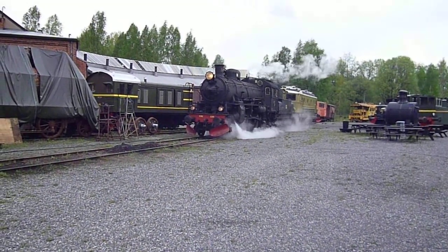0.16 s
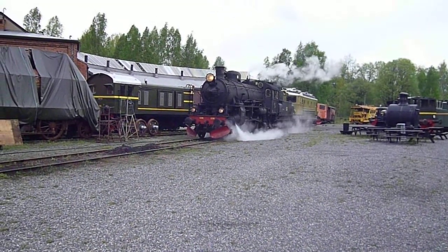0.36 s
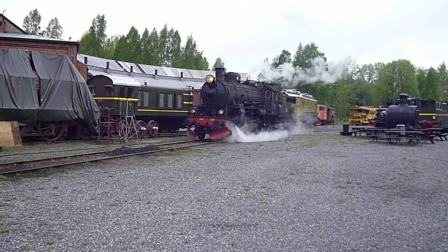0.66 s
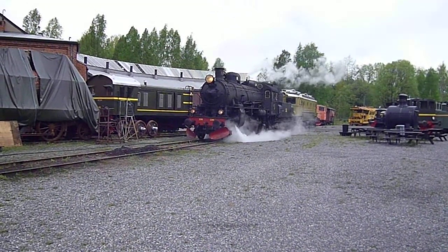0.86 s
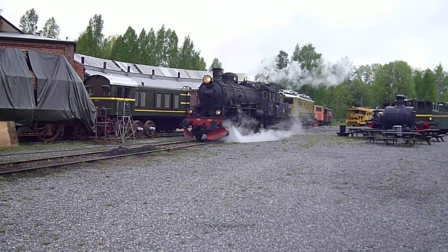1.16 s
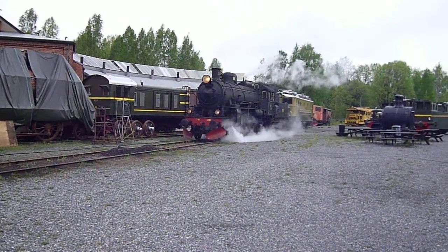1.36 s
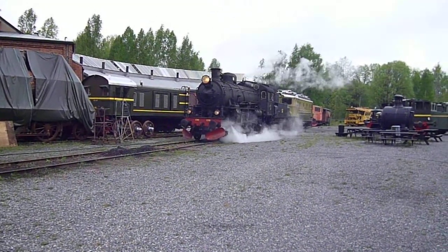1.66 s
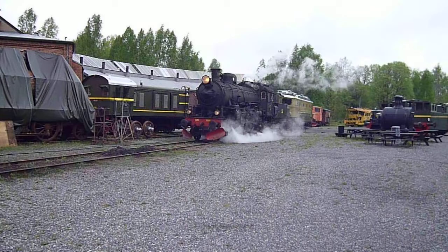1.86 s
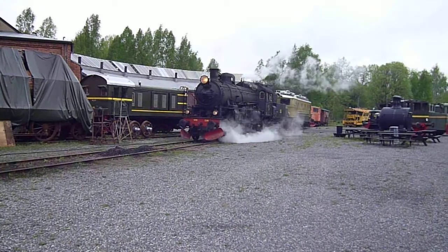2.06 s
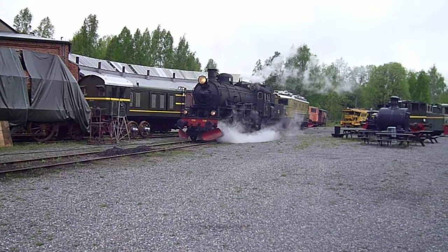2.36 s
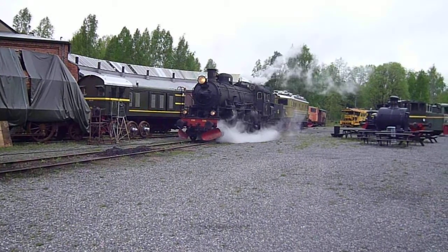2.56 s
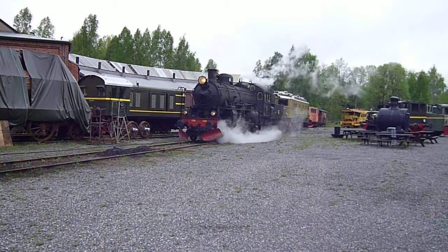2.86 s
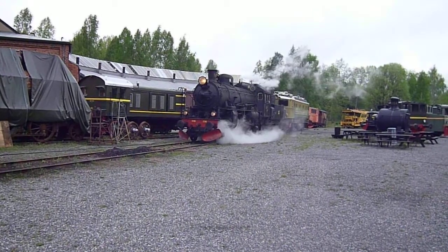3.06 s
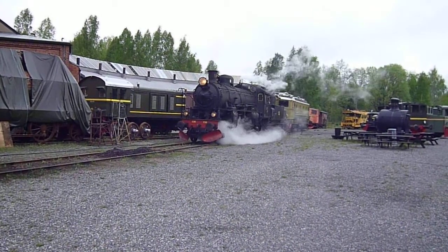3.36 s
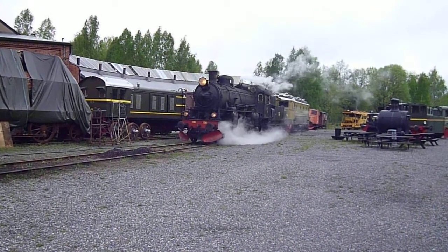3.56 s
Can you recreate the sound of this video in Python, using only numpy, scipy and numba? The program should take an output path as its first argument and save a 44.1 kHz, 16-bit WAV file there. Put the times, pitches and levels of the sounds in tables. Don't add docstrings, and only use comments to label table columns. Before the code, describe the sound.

Steam hisses steadily from a locomotive's drain valves, with wind thumps and one metallic clank.

```python
import sys
import numpy as np
from scipy import signal
from scipy.fft import rfft, irfft
from scipy.io import wavfile
from scipy.ndimage import uniform_filter1d
from numba import njit

SR = 44100
rng = np.random.default_rng(int(sys.argv[2]) if len(sys.argv) > 2 else 0)


def how_loud(loudness_db):
    steps = np.asarray(loudness_db, float) / 20
    return 10 ** steps


def transcribe(u):
    v = np.clip(np.atleast_2d(u).T, -1, 1)
    q = np.round(v * 32767).astype(np.int16)
    wavfile.write(sys.argv[1], SR, q)


N = 163170


@njit
def svf(x, hz, width):
    y, band_state, low_state = np.empty(len(x)), 0., 0.
    for i in range(len(x)):
        g, damping = np.tan(np.pi * hz[i] / SR), width / hz[i]
        v = (band_state + g * (x[i] - low_state)) / (1 + g * (g + damping))
        band_state = 2 * v - band_state
        low_state += 2 * g * v
        y[i] = damping * v
    return y


def band(hz, width):
    y = svf(rng.standard_normal(N), hz * np.ones(N), 1. * width)
    return y / y.std()


def steep(hz, width, order):
    y = band(hz, width)
    for _ in range(order):
        y = svf(y, hz * np.ones(N), 1. * width)
    return y / y.std()


def walk(rate):
    hold = int(SR / rate)
    w = np.repeat(rng.standard_normal(N // hold + 1), hold)
    w = uniform_filter1d(uniform_filter1d(w, hold), hold)[:N]
    return (w - w.mean()) / w.std()


def follow(points, t):
    return how_loud(np.interp(t, *np.array(points).T))


def drone(t):
    # centre in Hz, width in Hz, level in dB
    resonances = [
        (162, 46, -14),
        (292.6, 8.2, -25),
        (317.5, 14, -21),
    ]
    # time in seconds, level in dB
    draught = [
        (0, -2),
        (.6, 1.5),
        (1.2, 0),
        (1.8, -5.5),
        (2.4, 0),
        (2.8, 0),
        (3.3, 1.5),
        (3.7, 1),
    ]
    out = np.zeros(N)
    for hz, width, db in resonances:
        wavering_hz = hz * (1 + 0.019 * walk(4))
        out += steep(wavering_hz, width, order=1) * how_loud(db + 1.2 * walk(8.22))
    return follow(draught, t) * out


def buffer(t):
    # start in seconds, frequency in Hz, peak in dB, T60 in seconds
    partials = [(1.809, 655, -35.5, 1.4), (1.812, 666, -42, 1.4), (1.81, 700, -31, 0.13),
                (1.815, 1420, -28, .12), (1.855, 1475, -28, .16), (1.845, 942, -37, 0.38),
                (1.842, 985, -27, .1), (1.834, 4250, -27, .05), (1.86, 1136, -36, .26),
                (1.85, 1700, -38, .3), (1.84, 1900, -40, 0.92), (1.5, 2300, -41, 0.36)]
    out = np.zeros(N)
    for start, hz, db, t60 in partials:
        age = np.clip(t - start, 0, None)
        level = how_loud(db - 60 * age / t60 + 2.0 * walk(18))
        out += level * (1 - np.exp(-age / .004)) * np.sin(2 * np.pi * hz * age)
    return out


def scrapes(t):
    # start in seconds, level in dB, brightness in Hz, fade in seconds
    blows = [(1.791, -33.5, 2700, 0.0091), (1.805, -25, 2870, 0.0083), (1.811, -31, 800, 0.009),
             (1.8092, -31, 1440, 0.01), (1.815, -28, 2510, .006), (1.8202, -22.5, 4220, 0.002),
             (1.827, -28, 3100, .006), (1.828, -36.5, 335, 0.036), (1.831, -28, 1890, .009),
             (1.836, -26.5, 4200, 0.0046), (1.843, -30.5, 2530, .012), (1.843, -31, 1050, 0.014),
             (1.858, -31, 1410, 0.0098), (1.872, -34, 1500, .014)]
    crack_s = 0.0014
    out = np.zeros(N)
    for start, db, bright_hz, fade_s in blows:
        age = np.clip(t - start, 0, None)
        envelope = (1 - np.exp(-age / crack_s)) * np.exp(-age / fade_s)
        out += how_loud(db) * envelope * steep(bright_hz, 1.03 * bright_hz, order=1)
    return out


def hard_strike(t):
    # frequency in Hz, level in dB, T60 in seconds
    modes = [
        (2630, -18.5, 0.022),
        (3090, -17, .033),
        (3470, -11.5, 0.015),
        (4160, -12.5, 0.018),
        (4530, -18, 0.013),
        (5140, -20, 0.023),
    ]
    start_s, rise_s = 1.8211, .0008
    age = np.clip(t - start_s, 0, None)
    ring = sum(how_loud(db - 60 * age / t60) * np.sin(2 * np.pi * hz * age) for hz, db, t60 in modes)
    return ring * (1 - np.exp(-age / rise_s))


def clank(t):
    # frequency in Hz, level in dB, T60 in seconds
    modes = [(329, 0, .15), (690, -4, .08), (770, -4, .1), (1000, -4, .08), (1181, -8, .06), (1322, -3, .1),
             (1470, 0, .1), (1830, -8, .06), (2706, -8, .05), (3020, -6, .04), (3400, -8, .04),
             (4200, -11, .03), (5200, -10, .03)]
    crack_db, ring_db = 3.5, -46.5
    echo_db, echo_t60_s, echo_hz = -22.5, 0.82, 900
    age = t[:SR]
    iron = np.zeros(SR)
    for hz, db, t60 in modes:
        iron += how_loud(db) * np.sin(2 * np.pi * hz * age) * np.exp(-np.log(1000) * age / t60)
    blows = scrapes(t)
    ring = signal.fftconvolve(blows, iron)[:N]
    out = hard_strike(t) + how_loud(crack_db) * blows + how_loud(ring_db) * ring
    tail = band(echo_hz, 1800)[:SR] * np.exp(-np.log(1000) * age / echo_t60_s)
    echo = signal.fftconvolve(out, tail)[:N] / np.sqrt(np.sum(tail ** 2))
    return out + 4 * how_loud(echo_db) * echo


def eddies(t):
    # time in seconds, peak in dB, frequency in Hz, length in cycles
    early = [(.0057, -22, 220, .3), (0.0098, -26, 250, 0.29), (.017, -35, 200, 0.34),
             (0.026, -30, 250, 0.35), (0.0417, -35, 164.0, 0.51), (.0875, -30.5, 170, 0.47),
             (0.0943, -25.5, 420, 0.44), (0.1083, -21, 180, 0.49), (0.1145, -26.5, 200, 0.21),
             (.2123, -28, 280, .4), (0.2194, -26, 420, 0.56), (0.239, -31, 268, 0.43),
             (.285, -29.5, 170, .35), (0.293, -28.5, 110, 0.45), (0.3057, -31, 230, 0.45),
             (.3133, -35, 250, .35), (0.4842, -21.5, 178, 0.53), (0.6342, -21, 120, 0.38),
             (0.6503, -15, 200, 0.46), (.66, -26, 190, .35), (0.6656, -22, 170, .35),
             (0.674, -23, 180, 0.44), (.68, -23, 130, .3), (0.6885, -25, 228, 0.4), (.695, -27, 230, .3),
             (0.699, -19, 255, 0.3), (.704, -24, 230, 0.31), (0.7107, -24, 170, 0.4),
             (0.721, -29, 170, 0.43), (0.7424, -28, 182.0, 0.63), (.7545, -24, 150, .4),
             (0.7603, -16.5, 155, 0.3), (.7665, -23, 300, .3), (0.7698, -18, 320, 0.52),
             (0.773, -15.5, 308, 0.86), (0.7803, -13, 190, 0.34), (0.783, -17, 241, 0.28),
             (0.7905, -18, 230, 0.33), (0.7948, -11.5, 212, 0.49), (0.8228, -29, 240, 0.5)]
    late = [(1.1238, -30, 130, .3), (1.1302, -20, 170, .55), (1.131, -10, 270, 0.28),
            (1.144, -25, 200, .35), (1.151, -18.5, 240, 0.38), (1.1553, -18, 200, 0.25),
            (1.1567, -23, 140, .45), (1.1738, -26, 560, 0.45), (1.1752, -23.5, 420, 0.46),
            (1.189, -29.4, 214.0, 0.6), (1.599, -34, 170, 0.3), (1.6147, -26, 139, 0.45),
            (1.9485, -32, 280, 0.44), (1.97, -26, 162.0, 0.49), (1.981, -28, 171, 0.2),
            (2.183, -28.5, 148, 0.51), (2.3598, -25.5, 260, 0.4), (2.366, -13.5, 149, 0.31),
            (2.395, -24.5, 161, 0.36), (2.402, -24.5, 104, 0.42), (3.448, -28, 207.0, 0.4),
            (3.459, -12.5, 186, 0.53), (3.4652, -17, 200, .3), (3.4735, -19, 220, 0.32),
            (3.4785, -12.5, 187, 0.48), (3.4882, -17, 129, 0.37), (3.5148, -18.5, 160, 0.29),
            (3.644, -23.5, 162, 0.67)]
    snaps = [(.0075, -28, 480, 0.56), (.031, -32, 620, .5), (.096, -32.5, 700, 0.4),
             (0.2202, -36, 517, 0.44), (0.6992, -27, 560, 0.3), (0.7705, -20, 450, 0.48),
             (3.4585, -24, 416, 0.25), (1.1311, -23, 800, 0.37), (1.155, -22, 600, 0.64),
             (1.178, -30, 600, 0.4), (1.1357, -28, 650, .4)]
    rebound = .15
    out = np.zeros(N)
    for time, db, hz, cycles in early + late + snaps:
        near = abs(t - time) < .04
        turns = (t[near] - time) * hz
        envelope = np.exp(-.5 * ((turns - rebound) / max(cycles, .2)) ** 2)
        out[near] -= how_loud(db) * np.cos(2 * np.pi * turns) * envelope
    return out


def wind(t):
    # start in seconds, length in seconds, level in dB
    gusts = [(0, 0.048, -47), (0.087, 0.028, -40), (0.203, 0.09, -52), (0.414, 0.063, -47),
             (0.619, 0.1, -39.5), (0.753, 0.059, -34), (1.118, 0.068, -35.5), (1.603, 0.023, -47),
             (1.84, .1, -48), (1.963, 0.036, -43), (2.18, 0.062, -47.5), (2.346, 0.073, -44),
             (3.45, 0.065, -34.5), (3.56, 0.1, -48.5)]
    rumble_hz, rumble_width_hz, edge_s, breeze_db = 143.4, 293, 0.017, -51.5
    sway_hz, sway_db = 62.3, -2
    strength = sum(how_loud(db) * ((t > start) & (t < start + length)) for start, length, db in gusts)
    strength = uniform_filter1d(strength, int(edge_s * SR)) + how_loud(breeze_db + 2 * walk(13))
    lumps = how_loud(2.3 * walk(40)) * band(rumble_hz, rumble_width_hz) * strength
    for _ in range(3):
        lumps = svf(lumps, rumble_hz * np.ones(N), 1.24 * rumble_width_hz)
    sway = strength * how_loud(sway_db) * steep(sway_hz, 68, order=2)
    return eddies(t) + how_loud(4.0) * lumps + sway


def jets():
    # frequency in Hz, density in dB per Hz
    colour = [(18, -39), (35, -11), (100, -14.5), (250, -13.5), (700, -10), (1250, -14), (3100, -11),
              (8000, -12)]
    swell_db = 0.5
    f = np.arange(N // 2 + 1) * SR / N + 1
    hz, db = np.array(colour).T
    spectrum = rfft(rng.standard_normal(N)) * how_loud(np.interp(np.log(f), np.log(hz), db))
    place = 3 * np.log2(f / 20)
    out, swell = np.zeros(N), walk(6)
    for k in range(30):
        swell = 0.62 * swell + 1.1 * walk(5.77)
        triangle = np.clip(1 - abs(place - k), 0, 1)
        out += irfft(spectrum * triangle, N) * how_loud(swell_db * swell)
    return out / out.std()


def valve_whistle(t):
    # centre in Hz, width in Hz, level in dB
    resonances = [(1640, 100, -16.5), (2024, 90, -5.5), (2700, 134, -1), (3300, 130, 1), (4090, 180, -8.5),
                  (4710, 81, -5.5), (5330, 225, -1), (5854, 92, -5.5), (6560, 120, -7.5)]
    # time in seconds, level in dB
    opening = [
        (0, -9),
        (.8, -9.5),
        (1.4, -8.5),
        (1.8, -9),
        (2.1, -7),
        (2.5, -7.5),
        (3, -8.5),
        (3.7, -9),
    ]
    drift = 0.005
    out = np.zeros(N)
    for hz, width, db in resonances:
        out += band(hz * (1 + drift * walk(2.94)), 1.72 * width) * how_loud(db + .6 * walk(8.02))
    return follow(opening, t) * out


def steam(t):
    pressure_db = -0.14
    return (jets() + valve_whistle(t)) * how_loud(pressure_db * walk(6.44))


def reflect(x):
    spread_s, echo_db = .03, -15
    when, size = rng.random((24, 2)).T
    taps = np.zeros(SR // 10)
    delays = (40 + spread_s * SR * 2 * when ** 2).astype(int)
    taps[delays] = (size - .5) * how_loud(echo_db)
    taps[0] = 1
    return signal.fftconvolve(x, taps)[:N] / np.sqrt(np.sum(taps ** 2))


def scene():
    # time in seconds, level in dB
    ducking = [(0, -41), (.21, -39), (.49, -35.5), (.64, -34), (.776, -32), (.792, -40.5), (1.125, -36.5),
               (1.14, -37), (1.39, -35), (1.82, -29.5), (1.86, -38), (1.95, -36), (2.35, -31), (2.73, -29),
               (3.18, -27.5), (3.45, -27), (3.47, -30), (3.7, -29)]
    t = np.arange(N) / SR
    locomotive = reflect(steam(t)) + drone(t)
    mono = follow(ducking, t) * locomotive + wind(t) + clank(t) + buffer(t)
    return np.array([mono, mono])


def low_pass(x):
    return signal.sosfilt(signal.butter(12, 15900, fs=SR, output="sos"), x)


def record(dry):
    # frequency in Hz, gain in dB
    converter = [(6000, 0), (7000, 1.5), (7600, -2.5), (8000, -7), (8500, -16), (8900, -32), (9150, -45.5),
                 (9200, -110)]
    camera_rate_hz, offset = 16000, 0.013
    tick_s, tick_db = 1.9453, -24
    f = np.arange(N // 2 + 1) * SR / N
    fold = round(camera_rate_hz * N / SR)
    spectrum = rfft(dry)
    spectrum[:, fold // 2:fold] = np.conj(spectrum[:, fold - fold // 2:0:-1])
    mix = irfft(spectrum * follow(converter, f), N) + offset
    mix[:, int(tick_s * SR)] += how_loud(tick_db)
    return low_pass(mix)


dry = scene()
out = record(dry)
transcribe(out)
```